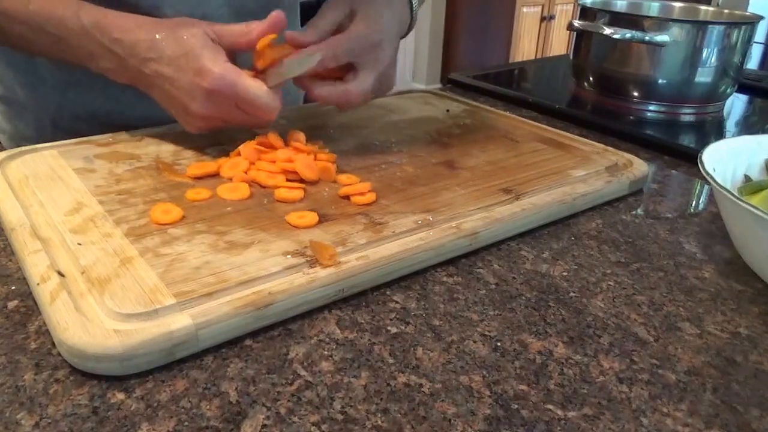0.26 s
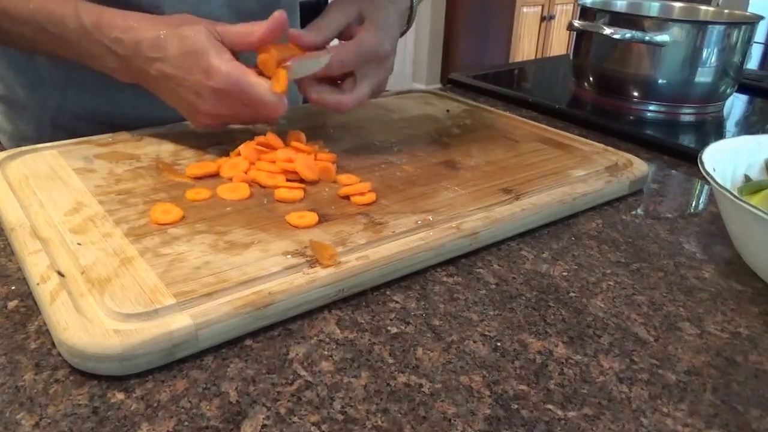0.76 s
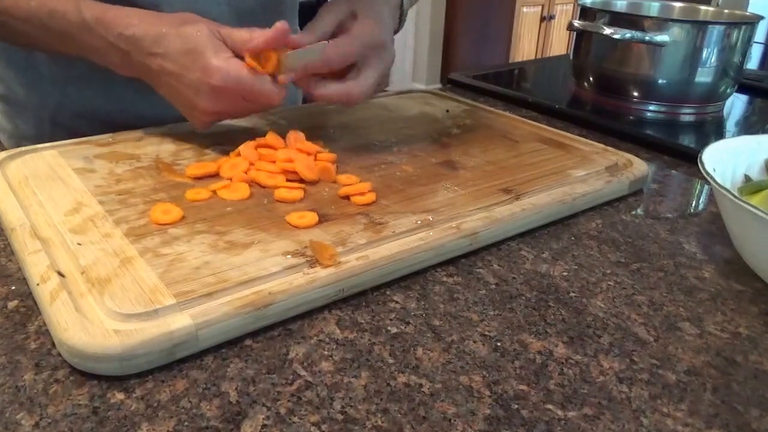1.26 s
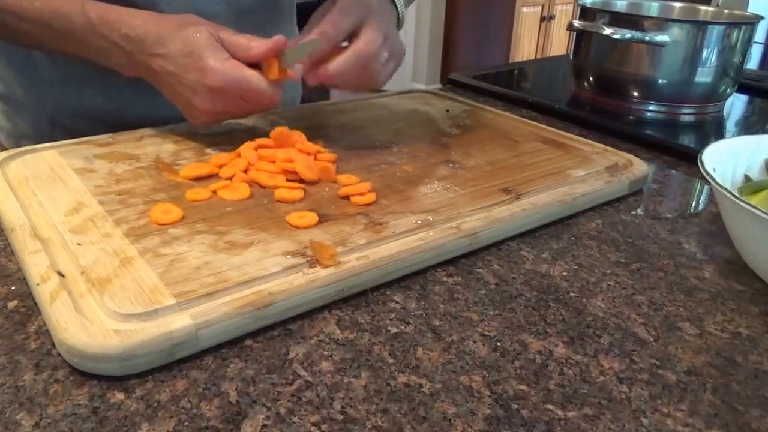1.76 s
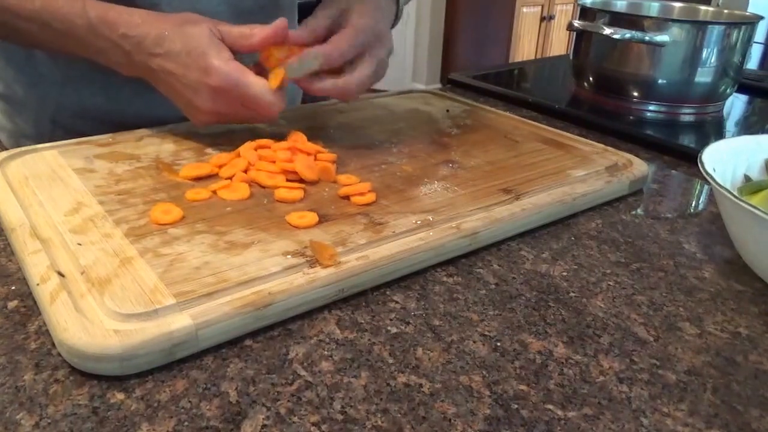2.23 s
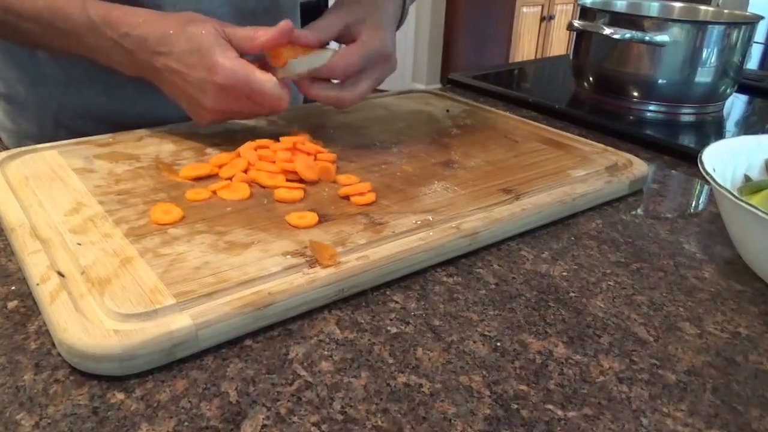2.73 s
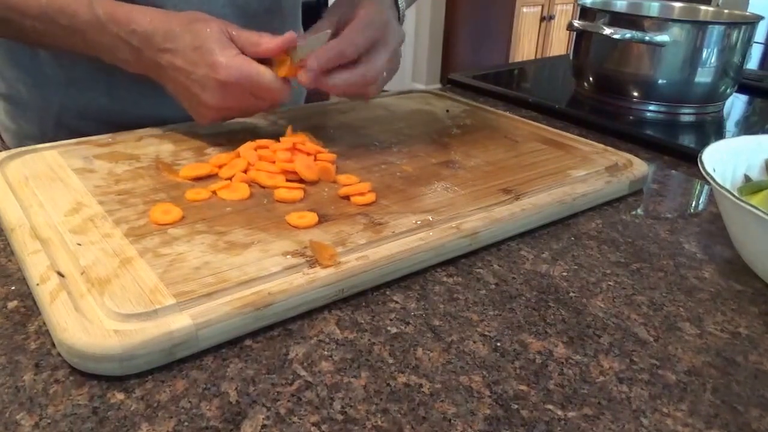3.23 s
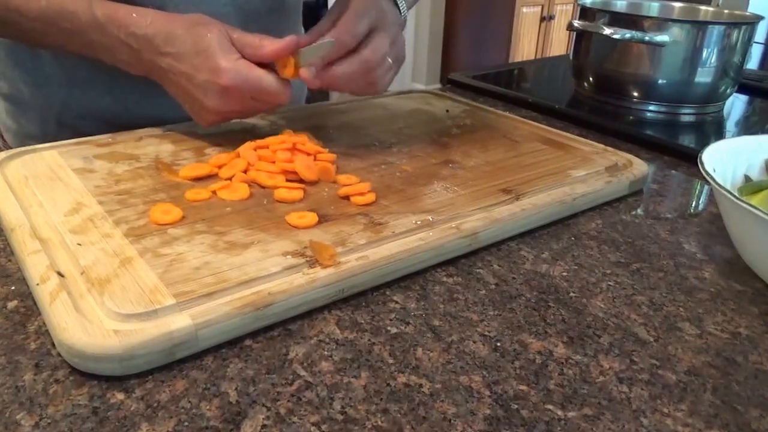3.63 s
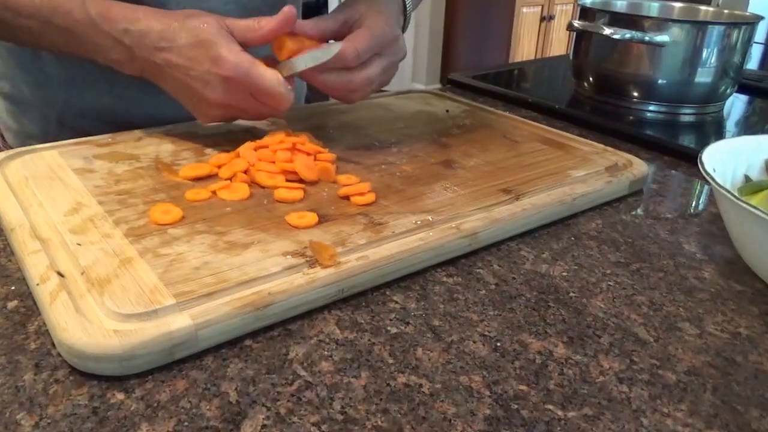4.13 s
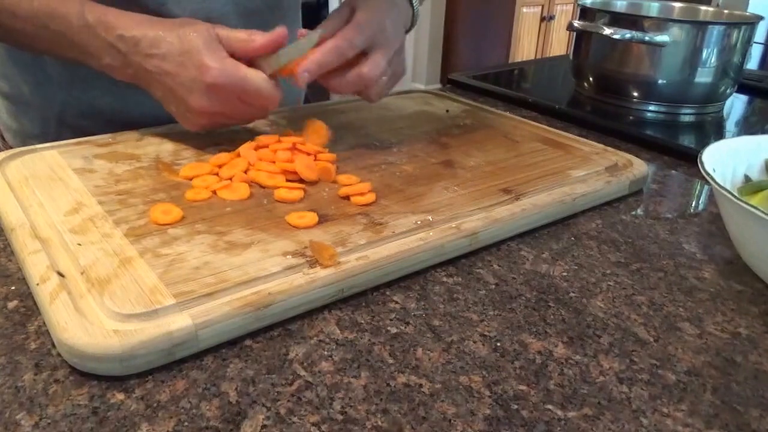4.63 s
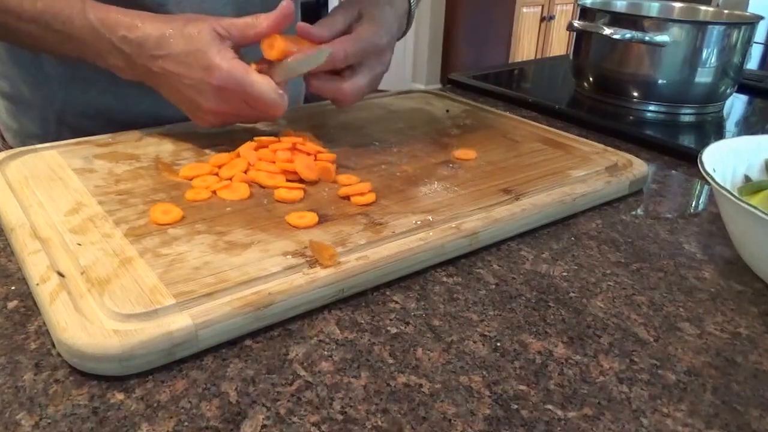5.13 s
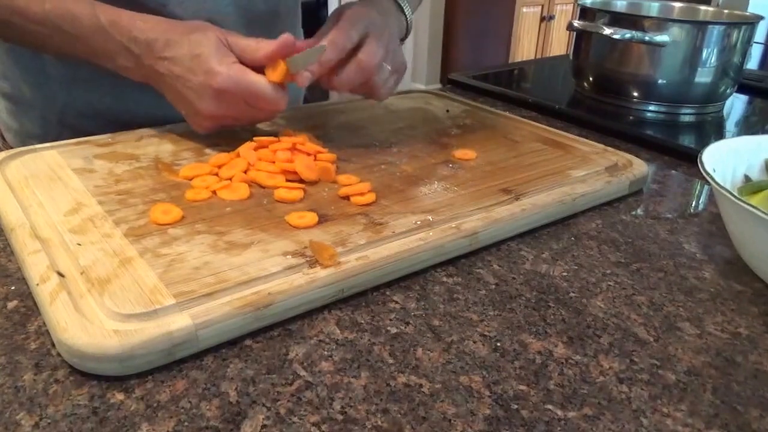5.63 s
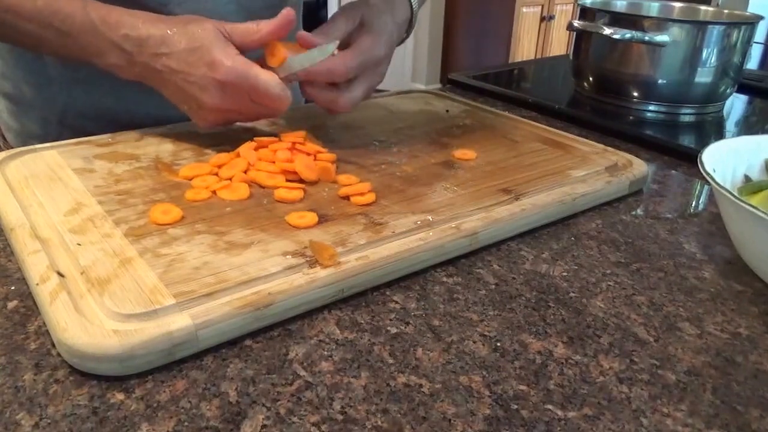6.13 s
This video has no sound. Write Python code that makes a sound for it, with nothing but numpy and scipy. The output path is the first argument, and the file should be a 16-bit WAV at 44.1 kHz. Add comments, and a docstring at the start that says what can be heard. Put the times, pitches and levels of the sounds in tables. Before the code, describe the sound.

A small knife slices a raw carrot in the hand with crisp, rasping crunches and sharp snaps, over a low kitchen appliance hum.

```python
"""A small knife slices a raw carrot held in the hand, above a wooden board in a quiet kitchen.
From the start appliances hum and whirr, wet fingers crackle faintly, and a first cut is already under way.
Each stroke is many tiny breaks that rasp and then grow crisp; quick bursts of breaks snap slices free.
Short ticks join in, later slices drop with a soft slap and ring, and the wet blade squeaks once.
Near the end a flap peels away with a sliding tone. The room answers faintly throughout."""
import sys
import numpy as np
from scipy import signal
from scipy.fft import rfft, irfft, next_fast_len
from scipy.io import wavfile
from scipy.ndimage import map_coordinates

SR = 44100
rng = np.random.default_rng(int(sys.argv[2]) if len(sys.argv) > 2 else 0)


def wav_out(sig):
    """Save sig, one row per channel (or a flat mono array), as 16-bit PCM at SR to the path in sys.argv[1]."""
    wavfile.write(sys.argv[1], SR, np.round(np.clip(np.atleast_2d(sig).T, -1, 1) * 32767).astype(np.int16))


N = 281799  # length in samples

# Tone colour of the appliances' whirr. Each row: frequency in Hz, strength in dB per Hz.
AIR_COLOUR = [(20, 3), (66, -4.5), (97, -6.5), (135, -5), (220, -1.5), (420, -4), (650, -7), (1020, -10),
              (1370, -10), (1700, -13.5), (2320, -18), (7400, -24.5), (11000, -26)]
AIR_DB = -52.94
# How alike the whirr is at both ears. Each row: frequency in Hz, likeness (1 is identical).
EAR_LIKENESS = [(60, 0.95), (140, 0.937), (350, 0.93), (840, 0.56), (2030, 0.45), (4880, 0.53),
                (11800, 0.9)]
# Steady tones of motors and mains. Each row: frequency in Hz, level in dB.
HUM_TONES = [(48.4, -62.5), (98.4, -73.5), (120, -73.5), (203.5, -65.5), (393, -72.5), (532.9, -66.5)]

# Strokes of the blade. Each row: start in seconds, hardest push in seconds, end in seconds,
# level in dB of the crisp crackle, of the rasp and of the hollow body sound.
STROKES = [ (-0.08, -0, 0.066, -44, -52, -58), (0.394, 0.483, 0.51, -37.5, -47.5, -59.5),
           (0.8, 0.919, 0.929, -37.5, -49, -57), (1.202, 1.287, 1.316, -35, -48, -59),
           (1.594, 1.659, 1.705, -35, -50, -57.5), (1.964, 1.994, 2.056, -38.5, -48.5, -52),
           (2.339, 2.411, 2.424, -32.5, -46, -52.5), (2.713, 2.77, 2.806, -35.5, -48, -50.5),
           (3.08, 3.12, 3.166, -37, -47.5, -48.5), (3.461, 3.511, 3.576, -37, -48.5, -53.5),
           (3.735, 3.746, 3.76, -40.5, -57.5, -62), (4.345, 4.438, 4.505, -38.5, -51, -55.5),
           (4.841, 4.88, 4.92, -59.5, -64, -61), (5.395, 5.56, 5.578, -43, -51.5, -56),
           (5.638, 5.7, 5.714, -43, -55.5, -60), (6.122, 6.188, 6.222, -39.5, -48.5, -56), ]
# The blade saws in regular jerks where it sticks. Each row: start in seconds, end in seconds,
# jerks per second, swing in dB to each side.
JUDDER = [(-0.014, 0.07, 53, 8.5), (0.864, 0.908, 72, 3.5), (4.353, 4.446, 63, 5), (5.398, 5.49, 58, 3)]
# Colours of the crackle, early and late in a stroke. Each row: frequency in Hz, strength in dB per Hz.
CRISP_SHALLOW = [(3000, -74), (6800, -33), (7800, -12), (8700, -2), (9600, 13), (10700, 8), (11500, -32),
                 (14000, -21)]
CRISP_DEEP = [(3000, -66), (6800, -39), (7900, -10), (8400, -11), (9000, -1), (9800, -1.5), (10700, 7),
              (11500, -13.5), (14000, -14.5)]
# Colours of the rasp, early and late in a stroke. Each row: frequency in Hz, strength in dB per Hz.
RASP_SHALLOW = [(300, -40), (1200, -17), (2300, -13.5), (3500, -6), (4500, -7), (5500, -2.5), (6200, -5),
                (6800, -14), (8000, -2.5), (11000, -28)]
RASP_DEEP = [(300, -26), (1200, -5.5), (1700, -3.5), (2200, -4.5), (2900, -7.5), (3400, 1.5), (3900, -3.5),
             (4500, 4), (5000, -3), (5900, 3.5), (6800, -8), (8000, -2), (11000, -7)]
# Hollow colour of a sounding slice. Each row: frequency in Hz, strength in dB per Hz.
BODY_COLOUR = [(150, -23), (400, -4.5), (680, -0.5), (1100, -11), (1600, -4), (2500, -15.5), (6000, -50)]
CRISP_RISE_DB, CRISP_CURVE = 20, 1.27  # the crackle grows all the way to the hardest push
RASP_RISE_DB, RASP_CURVE = 11, 2.96  # the rasp is there as soon as the edge is in
EASE_DB = 4.5  # both ease off as the flesh gives way
BODY_DEPTH, BODY_FALL_DB = 0.63, 38  # share of the cut where the slice sounds most; fall a whole cut away
STOP_DB_PER_S = 2203  # how fast the sound rises and falls as the blade enters and leaves

# Hard surfaces close by: board, counter and apron. Each row: delay in seconds, level in dB.
NEAR_SURFACES = [(.0013, -41), (.0041, -17), (.0074, -23)]
# How long the room's answer takes to fade by 60 dB. Each row: frequency in Hz, time in seconds.
ROOM_T60 = [(200, 0.3), (2000, 0.89), (10000, 0.37)]
# Loudness of the room's answer. Each row: frequency in Hz, level in dB.
ROOM_DB = [(200, -24), (2000, -2), (5000, -6.5), (9500, -13.5)]

# The flesh splits ahead of the edge, loudest as a slice breaks free.
# Each row: centre in seconds, level in dB, spread in seconds.
SNAPS = [(0.062, -39, .0011), (0.4776, -24, .0003), (0.5061, -21, 0.0016), (0.879, -32, 0.0017),
         (0.9255, -17, 0.001), (1.3124, -21.5, 0.0014), (1.6958, -27, 0.0022), (1.965, -38, .0007),
         (2.049, -31.5, .0013), (2.3984, -29, 0.00089), (2.417, -28, 0.0011), (3.156, -32.5, 0.0017),
         (3.535, -29, 0.00049), (3.7245, -45, 0.0011), (4.4977, -26, 0.0041), (4.5039, -14.5, 0.00045),
         (4.509, -16, 0.0015), (5.5362, -30.5, 0.00044), (5.5578, -34.5, .001), (5.708, -28.5, 0.0019),
         (6.212, -28.5, 0.0016)]
# Crisp colour of bursting cells in a crack. Each row: frequency in Hz, strength in dB per Hz.
SNAP_COLOUR = [(3000, -43), (6800, -25.5), (8100, -15), (8800, -3.5), (9700, 0), (10700, 1), (11500, -15),
               (14000, -10.5)]
SNAP_RASP_DB, SNAP_RASP_GROWS = -23.5, 0.73  # rasp of a 0 dB snap; its dB per dB: harder snaps are crisper
# The edge catches on the carrot's skin in a short, dull crunch. Each row: centre in seconds, level in dB.
CATCHES = [(0.385, -49.5), (1.609, -49), (3.7507, -49), (4.1828, -44), (4.207, -47), (4.318, -47.5),
           (4.353, -42.5), (4.3663, -51), (6.098, -43.5), (6.156, -42)]
CATCH_SPREAD_S = 0.0015
CRACK_BUILD, CRACK_STOP = 2.57, 1.4  # a crack gathers slowly and stops short (in spreads)

# Wet ticks of blade, thumb and carrot. Each row: time in seconds, level in dB, pitch in Hz.
TICKS = [(0.1054, -34.5, 4500), (0.197, -34.5, 7200), (1.1853, -32, 8600), (1.397, -34.5, 9800),
         (1.409, -36, 1900), (1.493, -36.5, 9200), (1.872, -39.5, 7000), (2.1132, -21.5, 4870),
         (2.4945, -35.5, 9800), (2.5222, -29.5, 3000), (3.626, -35, 9900), (3.699, -38, 10000),
         (4.0739, -45, 2200), (5.0792, -32, 9750), (5.8153, -35.5, 7000), (6.1558, -29, 7500)]
# Slices landing on the heap or the board. Each row: time in seconds, level in dB, pitch in Hz,
# time in seconds to fade by 60 dB, upper tone in dB against the lower one.
DROPS = [(1.409, -39.5, 1050, 0.039, 3), (2.522, -50, 1225, .04, -8), (4.072, -39.5, 1270, 0.021, -3),
         (4.719, -41.5, 694, 0.031, -13), (4.968, -45.5, 1250, 0.044, -16), (5.08, -40, 1426, 0.05, -19)]

# The wet blade squeaks against the carrot, sinking in pitch and dying away.
SQUEAK_S, SQUEAK_LENGTH_S, SQUEAK_ATTACK_S = 2.262, 0.083, 0.0047
SQUEAK_HZ, SQUEAK_SAG_HZ_PER_S = 1580, 1480
SQUEAK_DB, SQUEAK_FADE_DB_PER_S = -46.5, 207
SQUEAK_ROUGH = 0.57  # share of rubbing noise in the squeak's power
# Colour of the rubbing noise. Each row: frequency in Hz, strength in dB per Hz.
RUB_COLOUR = [(300, -27), (650, 5), (1200, -9), (1650, -2), (2100, -7), (3100, -9), (3650, -4), (4200, -12),
              (7000, -13), (11000, -28)]

# The last slice peels away as a flap that rings lower as it lengthens.
FLAP_S, FLAP_LENGTH_S, FLAP_FROM_HZ, FLAP_TO_HZ, FLAP_DB = 6.168, 0.053, 3800, 2100, -49.5

TOP_HZ = 11130  # upper band limit


def amp(db):
    """Turn decibels into a plain multiplier."""
    return 10 ** (np.asarray(db) / 20)


def unit(x):
    """Scale a sound to an average (rms) level of 1."""
    return x / np.sqrt(np.mean(x ** 2) + 1e-20)


def along(points, hz):
    """Read a table of (Hz, value) rows at any frequency, on a log axis."""
    f, v = np.transpose(points)
    return np.interp(np.log(hz + 1), np.log(f + 1), v)


def add(track, s, sound):
    """Mix a sound into a track from time s on, dropping what lies outside."""
    start = round(s * SR)
    sound, start = sound[max(0, -start):], max(0, start)
    track[start:start + len(sound)] += sound[:max(0, N - start)]


def wobble(rate, size):
    """Draw a smooth random curve with rate random points a second."""
    points = rng.standard_normal(int(size * rate / SR) + 4)
    return map_coordinates(points, [np.arange(size) * rate / SR])


def filtered(x, response):
    """Multiply the spectrum of x by a response that depends on frequency."""
    m = next_fast_len(N + SR // 2)
    spectrum = rfft(x, m) * response(np.fft.rfftfreq(m, 1 / SR))
    return irfft(spectrum, m)[..., :N]


def ring(pulses, colour, ripple_db, size=512):
    """Colour pulses with chance resonances (the stub's shape and grip change), at rms 1."""
    hz = np.fft.rfftfreq(size, 1 / SR)
    points = rng.standard_normal(size // 8)
    ripple = map_coordinates(points, [np.arange(len(hz)) / 4], mode="mirror")
    # folding the cepstrum makes the response start at once, with nothing before the pulse
    cepstrum = irfft(np.log(amp(along(colour, hz) + ripple_db * ripple)))
    cepstrum[1:size // 2] *= 2
    cepstrum[size // 2 + 1:] = 0
    response = irfft(np.exp(rfft(cepstrum)))
    return unit(np.convolve(pulses, response)[:len(pulses)])


def fractures(size, rate, scatter_db):
    """Make tiny breaks, rate a second, at uneven moments and of uneven sizes."""
    chance = rng.random(size)
    sizes = rng.standard_normal(size)
    signs = rng.choice([-1, 1], size)
    slot = (np.arange(size) * rate / SR).astype(int)
    first = np.flatnonzero(np.diff(slot, prepend=-1))
    breaks = chance == np.maximum.reduceat(chance, first)[slot]  # one break somewhere in each slot
    return breaks * signs * amp(scatter_db * np.clip(sizes, -2, 2))


def appliances():
    """A fan whirrs as steady coloured noise, with slightly unsteady motor and mains tones."""
    def turn(hz):
        return np.arccos(np.clip(along(EAR_LIKENESS, hz), -1, 1)) / 2

    def mid_and_side(hz):
        low_cut = hz ** 2 / (hz ** 2 + 75 ** 2)
        return amp(along(AIR_COLOUR, hz)) * low_cut * [np.cos(turn(hz)), np.sin(turn(hz))]

    mid, side = filtered(rng.standard_normal((2, N)), mid_and_side)
    whirr = amp(AIR_DB) * unit(np.array([mid + side, mid - side]))
    t = np.arange(N) / SR
    hum = np.zeros(N)
    for hz, db in HUM_TONES:
        drift = hz / 400 * wobble(5, N)
        hum += amp(db) * unit(np.sin(2 * np.pi * hz * t + drift))
    return whirr + hum


def handling():
    """Wet fingers shift on the carrot and keep up a faint, sparse crackle."""
    smacks = fractures(N, rate=14, scatter_db=7)
    return amp(-72.0) * ring(smacks, CRISP_DEEP, ripple_db=1.0)


def jerks(t):
    """Level swing in dB of a blade that sticks and slips in a steady rhythm."""
    swing_db = np.zeros(len(t))
    for start, end, rate, depth_db in JUDDER:
        sticking = (t > start) * (t < end)
        swing_db += depth_db * np.cos(2 * np.pi * rate * (t - start)) * sticking
    return swing_db


def strokes():
    """The blade bursts rows of cells, harder as the push builds; the colour shifts as it sinks in."""
    out = np.zeros(N)
    for start, hardest, end, crisp_db, rasp_db, body_db in STROKES:
        t = np.arange(start - .01, end + 0.062, 1 / SR)
        slack = np.interp(t, [start, hardest], [1, 0])  # share of the push still to come
        giving = np.interp(t, [hardest, end], [0, 1])
        sunk = np.interp(t, [start, end], [0, 1])
        outside_s = np.abs(t - np.clip(t, start, end))
        motion_db = jerks(t) - EASE_DB * giving ** 2 - STOP_DB_PER_S * outside_s
        crisp = amp(crisp_db + motion_db - CRISP_RISE_DB * slack ** CRISP_CURVE)
        rasp = amp(rasp_db + motion_db - RASP_RISE_DB * slack ** RASP_CURVE)
        body = amp(body_db + motion_db - BODY_FALL_DB * (sunk - BODY_DEPTH) ** 2)
        # uneven flesh, fine and coarse
        toughness = amp(1.75 * wobble(258, len(t)) + 1.25 * wobble(87, len(t)))
        rows = toughness * fractures(len(t), rate=1700, scatter_db=4.5)
        cells = toughness * fractures(len(t), rate=4000, scatter_db=2.5)
        # fade from the shallow colours to the deep ones
        depth = np.linspace(0, 1, len(t))
        shallow, deep = np.cos(np.pi / 2 * depth), np.sin(np.pi / 2 * depth)
        crackle = np.sqrt(1 - depth) ** 3 * ring(cells, CRISP_SHALLOW, ripple_db=0.5)
        crackle += np.sqrt(1 - (1 - depth) ** 3) * ring(rows, CRISP_DEEP, ripple_db=0.8)
        scrape = shallow * ring(cells, RASP_SHALLOW, ripple_db=3.5)
        scrape += deep * ring(rows, RASP_DEEP, ripple_db=2.0)
        hollow = ring(cells, BODY_COLOUR, ripple_db=2)
        add(out, t[0], crisp * crackle + amp(1.67) * rasp * scrape + body * hollow)
    return out


def near_surfaces(x):
    """Hard surfaces close by add weak, delayed copies, alike at both ears."""
    def response(hz):
        return 1 + sum(amp(db) * np.exp(-2j * np.pi * hz * delay) for delay, db in NEAR_SURFACES)

    return filtered(x, response)


def room_tail():
    """The kitchen's diffuse answer to a click: fading noise, different at each ear, strongest at its start."""
    hz, t, z = signal.stft(rng.standard_normal((2, SR // 2)), SR, nperseg=256)
    fade = amp(-60 * t / along(ROOM_T60, hz)[:, None])
    tail = signal.istft(z * fade, SR, nperseg=256)[1]
    t = np.arange(tail.shape[1]) / SR
    tail = tail * (1 + 2.4 * np.exp(-t / 0.0094)) * (t > .002)
    return tail / np.linalg.norm(tail[0])


def room(x, size=SR // 3):
    """The hands keep moving, so each third of a second meets a slightly different echo."""
    echo = np.zeros((2, N))
    for start in range(0, N, size):
        for ear, tail in zip(echo, room_tail()):
            add(ear, start / SR, signal.fftconvolve(x[start:start + size], tail))
    return filtered(echo, lambda hz: amp(along(ROOM_DB, hz)))


def cracks():
    """A crack runs through the flesh in a quick cascade of breaks: crisp in a snap, half rasp in a catch."""
    out = np.zeros(N)
    t = np.arange(-SR // 100, SR // 50) / SR
    snaps = [(s, db, SNAP_RASP_DB + SNAP_RASP_GROWS * db, spread) for s, db, spread in SNAPS]
    catches = [(s, db, db, CATCH_SPREAD_S) for s, db in CATCHES]
    for s, crisp_db, rasp_db, spread in snaps + catches:
        width = spread * np.where(t < 0, CRACK_BUILD, CRACK_STOP)
        swell = np.exp(-(t / width) ** 2)
        large = swell * fractures(len(t), rate=2200, scatter_db=7.0)
        small = swell * fractures(len(t), rate=5000, scatter_db=7.0)
        crisp = amp(crisp_db) * ring(large, SNAP_COLOUR, ripple_db=2)
        rasp = amp(rasp_db) * ring(small, RASP_DEEP, ripple_db=4)
        add(out, s + t[0], (crisp + rasp) * np.sqrt(np.mean(swell ** 2)))
    return out


def ticks():
    """One sharp contact, a tone that dies within a millisecond, with a little wet spatter of noise."""
    out = np.zeros(N)
    t = np.arange(SR // 40) / SR
    for s, db, hz in TICKS:
        click = np.sin(2 * np.pi * hz * t) * amp(-60 * t / 0.00094)
        spatter = np.diff(rng.standard_normal(len(t) + 1)) * amp(-60 * t / 0.011)
        add(out, s, amp(db + 1.5) * (click + 0.27 * spatter))
    return out


def drops():
    """A falling slice lands with a soft slap of noise and rings briefly in two fading tones."""
    out = np.zeros(N)
    t = np.arange(SR // 8) / SR

    def mode(hz, t60):
        return amp(-60 * t / t60) * np.sin(2 * np.pi * hz * t + .4 * wobble(252, len(t)))

    for s, db, hz, t60, upper_db in DROPS:
        modes = mode(hz, t60) + amp(upper_db) * mode(1.83 * hz, 0.29 * t60)
        noise = ring(rng.standard_normal(len(t)), BODY_COLOUR, ripple_db=3.0)
        slap = noise * amp(-60 * t / 0.021)
        add(out, s, amp(db) * (0.66 * modes + 0.26 * slap))
    return out


def squeak():
    """Wet steel slips on the carrot in a brief, rough tone mixed with rubbing noise."""
    out = np.zeros(N)
    t = np.arange(0, SQUEAK_LENGTH_S, 1 / SR)
    pitch = (SQUEAK_HZ - SQUEAK_SAG_HZ_PER_S * t) * (1 + 0.036 * wobble(604, len(t)))
    phase = 2 * np.pi * np.cumsum(pitch) / SR
    flutter = amp(2.5 * wobble(300, len(t)))
    tone = unit((np.sin(phase) + 0.36 * np.sin(2 * phase)) * flutter)
    rub = ring(rng.standard_normal(len(t)), RUB_COLOUR, ripple_db=3.5)
    level = np.minimum(t / SQUEAK_ATTACK_S, 1) * amp(SQUEAK_DB - SQUEAK_FADE_DB_PER_S * t)
    add(out, SQUEAK_S, level * (np.sqrt(1 - SQUEAK_ROUGH) * tone + np.sqrt(SQUEAK_ROUGH) * rub))
    return out


def flap():
    """A broad, ragged resonance slides down: a falling tone, randomly shaken to spread its pitch."""
    out = np.zeros(N)
    u = np.linspace(0, 1, int(FLAP_LENGTH_S * SR))
    pitch = FLAP_FROM_HZ * (FLAP_TO_HZ / FLAP_FROM_HZ) ** u
    phase = 2 * np.pi * np.cumsum(pitch) / SR
    band = unit(wobble(1392, len(u)) * np.sin(phase) + wobble(1397, len(u)) * np.cos(phase))
    add(out, FLAP_S, amp(FLAP_DB) * np.sin(np.pi * u) * band)
    return out


def scene():
    """Knife and carrot sound close by and in the middle; the whole mix leans slightly to the left."""
    knife = handling() + strokes() + cracks() + ticks() + drops() + squeak() + flap()
    mix = appliances() + amp(0.1) * near_surfaces(knife) + room(knife)
    return mix * amp([[.25], [-.25]])


def record(dry):
    """A very steep filter keeps next to nothing above the band limit."""
    # the ratio is capped at 2 so that the high power stays finite
    return filtered(dry, lambda hz: 1 / np.sqrt(1 + np.minimum(hz / TOP_HZ, 2) ** 300))


dry = scene()
out = record(dry)
wav_out(out)
```